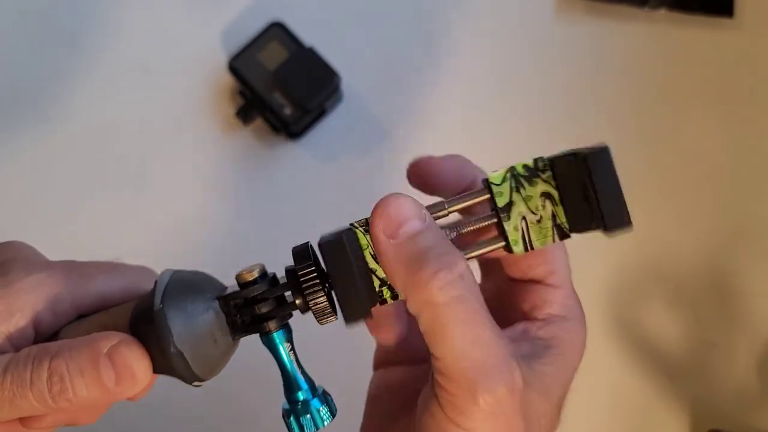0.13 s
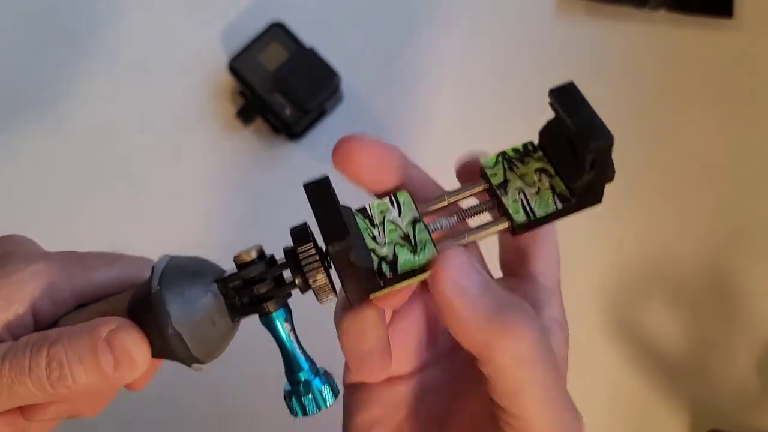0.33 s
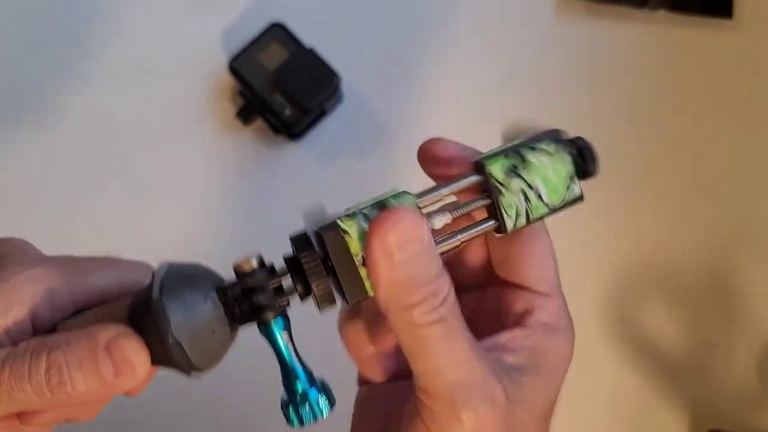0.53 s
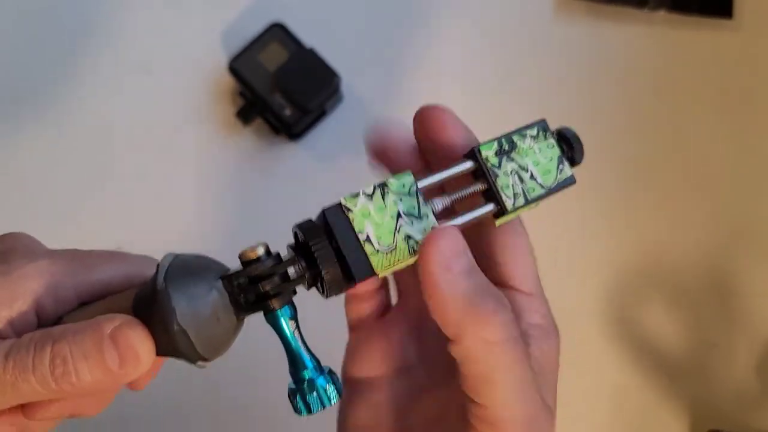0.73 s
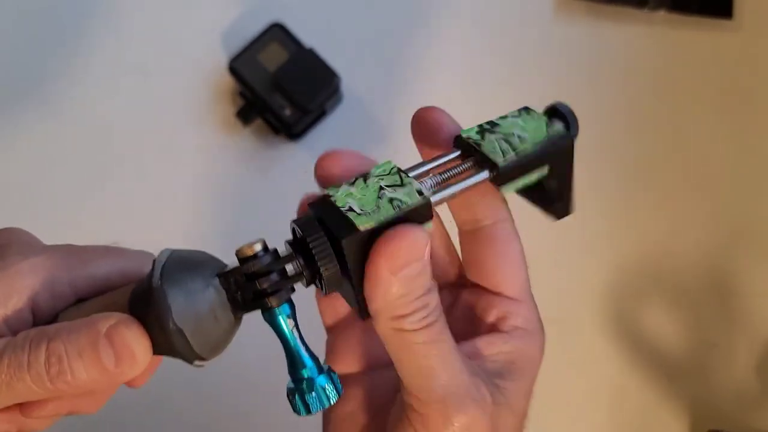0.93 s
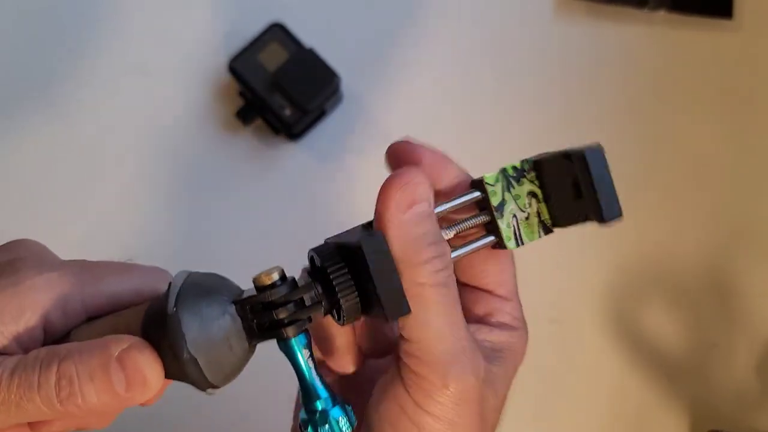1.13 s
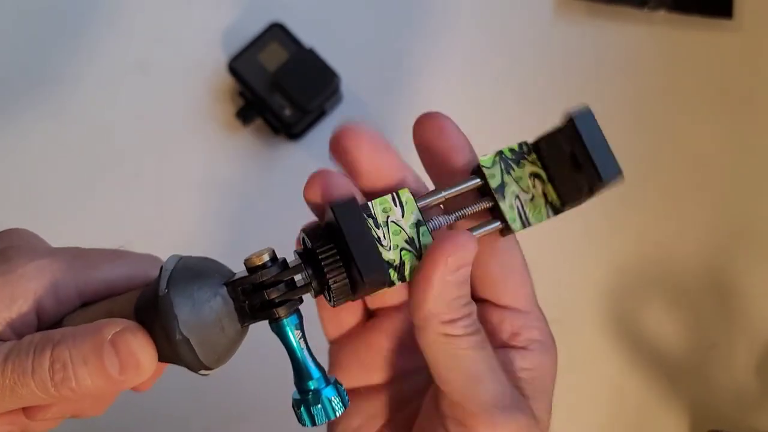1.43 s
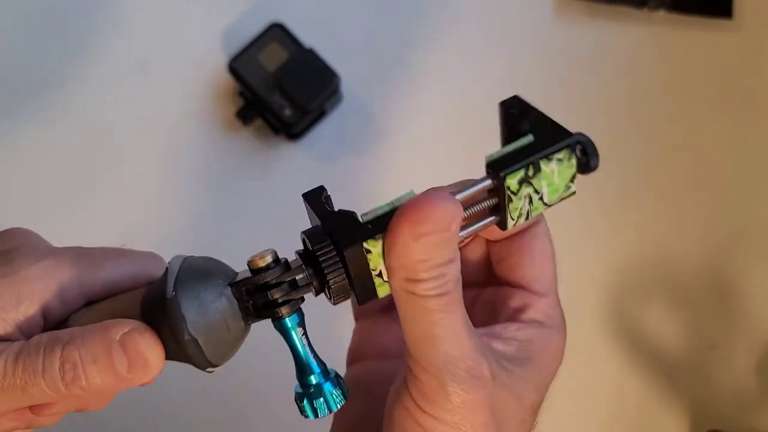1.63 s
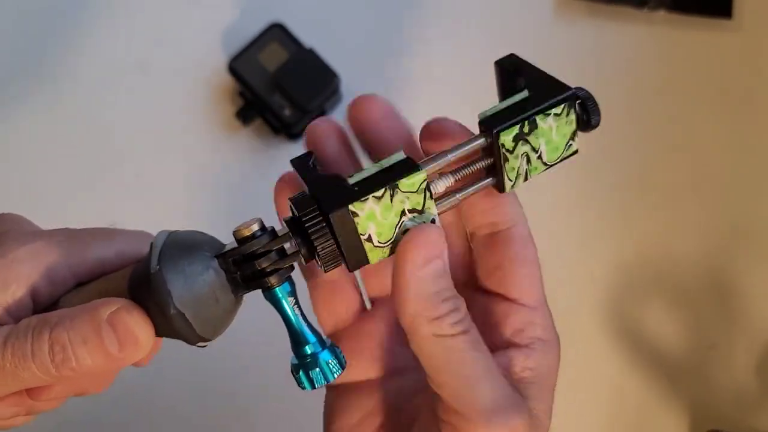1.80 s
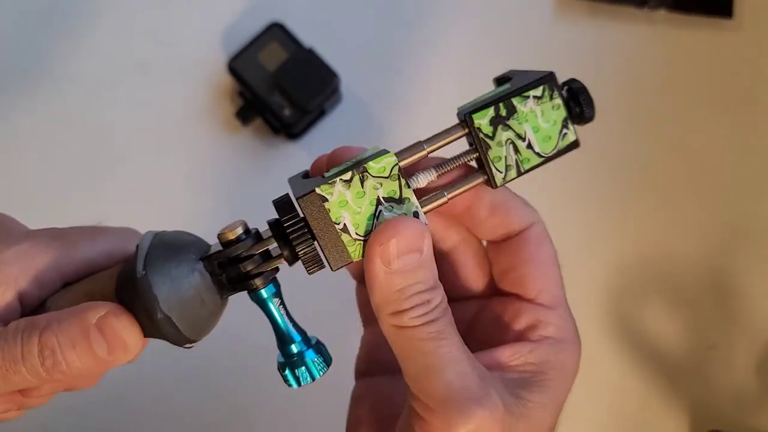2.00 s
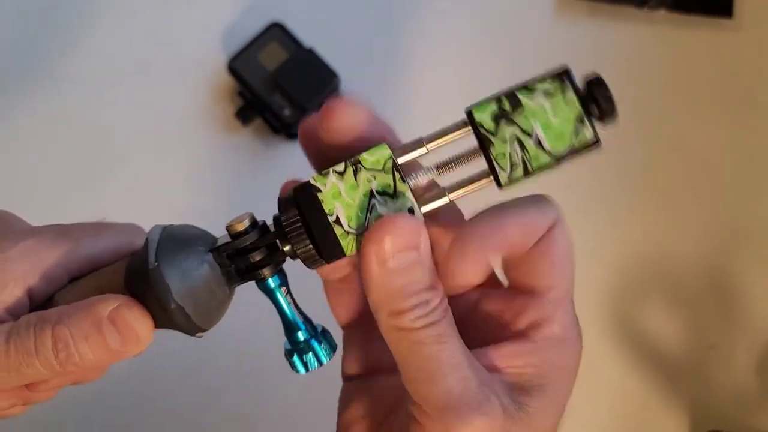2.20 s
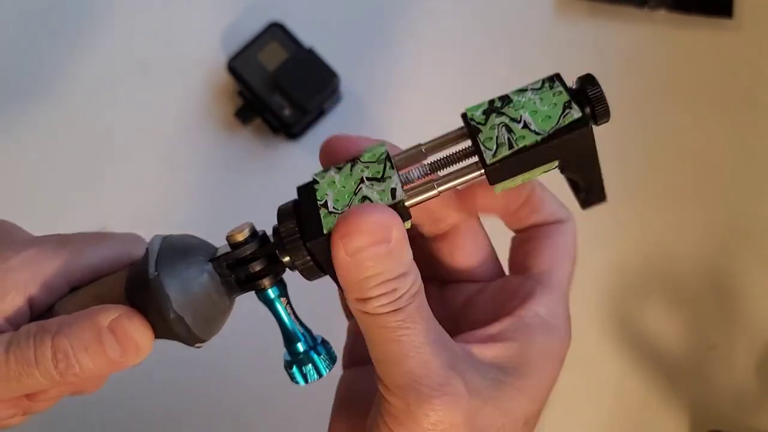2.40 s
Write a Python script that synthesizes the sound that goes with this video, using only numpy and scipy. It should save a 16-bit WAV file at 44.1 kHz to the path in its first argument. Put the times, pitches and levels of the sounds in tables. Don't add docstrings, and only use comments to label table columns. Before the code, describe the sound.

A small metal and plastic clamp is spun by hand, very close, in a quiet small room. Light clicks start at once; a dull low table thump booms at 0.2-0.3 s. A loud bright clack lands at 0.57 s, then sparse ticks, weaker snaps at 1.0 and 1.88 s, soft taps around 1.2 and 1.6 s, and a hard double clatter at 2.22 s. Faint skin and thread rubbing continues intermittently, ending with a light brush at 2.55 s.

```python
import sys
import numpy as np
from scipy import signal
from scipy.fft import rfft, irfft
from scipy.io import wavfile

SR = 44100
rng = np.random.default_rng(int(sys.argv[2]) if len(sys.argv) > 2 else 0)


def decibels_to_gain(level_db):
    exponent = np.asarray(level_db, float) / 20
    return 10 ** exponent


def store_wav(level_fs):
    pcm = np.round(np.clip(np.atleast_2d(level_fs), -1, 1) * 32767)
    wavfile.write(sys.argv[1], SR, pcm.T.astype(np.int16))


N = 112454


def rms_one(x):
    return x / np.sqrt(np.mean(x ** 2) + 1e-20)


def drift(rate_hz):
    step = 40
    pole = np.exp(-2 * np.pi * rate_hz * step / SR)
    noise = rng.standard_normal(N // step + 2002)
    slow = signal.lfilter([1], [1, -2 * pole, pole * pole], noise)[2000:]
    return np.interp(np.arange(N) / step, np.arange(len(slow)), rms_one(slow))


def colour(x, points):
    hz, db = np.transpose(points)
    f = np.arange(N // 2 + 1) * SR / N + 1
    gain = decibels_to_gain(np.interp(np.log(f), np.log(hz), db))
    return rms_one(irfft(rfft(x) * gain, N))


def band(x, low_hz, high_hz):
    edges = [low_hz, min(high_hz, .45 * SR)]
    return signal.sosfilt(signal.butter(2, edges, "band", fs=SR, output="sos"), x)


def low_pass(x, order, hz):
    return signal.sosfilt(signal.butter(order, hz, fs=SR, output="sos"), x)


def train(s, sizes):
    at = np.clip((s * SR).astype(int), 0, N - 1)
    return np.bincount(at.ravel(), np.ravel(sizes), N)


def ring(clicks, hz, t60):
    r, w = decibels_to_gain(-60 / (t60 * SR)), 2 * np.pi * hz / SR
    return signal.lfilter([0, np.sin(w)], [1, -2 * r * np.cos(w), r * r], clicks + 1e-18)


# (frequency [Hz], density [dB per Hz])
AIR_MID = [(18, -45.5), (30, -6), (66, -0.5), (187, -14), (307, -12), (945, -27.5), (1510, -25.5),
           (6890, -34), (15500, -46.5)]
AIR_SIDE = [(18, -40.5), (30, -9), (69, -1.5), (160, -13.5), (420, -6), (945, -19), (1400, -17),
            (7080, -31), (15500, -40.5)]


def air():
    mid = decibels_to_gain(-55.5 + 0.5 * drift(18)) * colour(rng.standard_normal(N), AIR_MID)
    side = decibels_to_gain(-57.5 + 1.1 * drift(4.6)) * colour(rng.standard_normal(N), AIR_SIDE)
    return np.array([mid + side, mid - side])


def room(x):
    room_t60_s, scatter_t60_s = 0.2, .08
    t = np.arange(SR // 2) / SR
    white = rng.standard_normal((2, len(t)))
    dull = low_pass(white, 1, 6400)
    tail = dull * decibels_to_gain(-60 * t / room_t60_s) + .25 * white * decibels_to_gain(-60 * t / scatter_t60_s)
    tail *= np.clip(.25 + t / .02, 0, 1)
    return signal.fftconvolve(x, tail / np.sqrt(np.sum(tail ** 2) / 2), axes=1)[:, :N]


def blurred(x):
    swing = low_pass(rng.standard_normal(N), 1, 600)
    return x * np.tanh(2 * rms_one(swing))


# (time [s], level [dB])
SWAY = [(0, -48.5), (.17, -70.5), (.6, -35), (.69, -42.5), (.86, -58), (1.15, -45), (1.28, -55),
        (1.38, -45), (1.5, -42), (1.6, -57.5), (1.77, -48), (1.9, -54.5), (2.1, -74), (2.21, -51),
        (2.55, -61)]


def sway():
    hum = band(rng.standard_normal(N + SR), 43.5, 67.2)[SR:]
    level_db = np.interp(np.arange(N) / SR, *np.transpose(SWAY))
    return decibels_to_gain(np.minimum(level_db, -43)) * rms_one(hum)


# (time [s], level [dB], direction [+1 or -1])
BUMPS = [
    (.202, -24, 1),
    (.217, -27, 1),
    (.2308, -21.8, -1),
    (.239, -16, 1),
    (.2486, -17.9, 1),
    (.2828, -15.5, -1),
]
# (frequency [Hz], level [dB], decay t60 [s])
TABLE_MODES = [(41.9, -16, 2.0), (55.6, -9.5, 2.0), (64.2, 5.8, .53), (82.3, -8.5, 2.0), (87.8, -6.7, 1.9),
               (100.9, -2.8, .78), (222, -16, .25)]


def table():
    hand_rests_s, hand_t60_s = .52, .4
    s, db, direction = np.transpose(BUMPS)
    push = low_pass(train(s, decibels_to_gain(db) * np.sign(direction)), 4, 155)
    boom = sum(decibels_to_gain(db - 5.5) * ring(push, hz, t60) for hz, db, t60 in TABLE_MODES)
    hand = decibels_to_gain(-60 * np.maximum(np.arange(N) / SR - hand_rests_s, 0) / hand_t60_s)
    return hand * boom


# (start [s], length [s], level
# [dB], centre frequency [Hz], width [octaves])
RUBS = [(.001, 0.13, -48.5, 5700, 2.6), (.01, 0.044, -48.5, 2280, 0.22), (0.188, 0.44, -50, 435, 1.15),
        (0.45, 0.063, -48.5, 3430, 2.7), (0.514, 0.045, -40, 9500, 4.3), (.49, 0.052, -53.5, 9100, 2.3),
        (0.517, 0.36, -48.5, 537, 0.86), (0.93, 0.18, -50.5, 503, 1.3), (0.941, 0.28, -54.5, 2970, 3.16),
        (0.978, 0.12, -51, 11100, 1.15), (1.059, 0.12, -55.5, 10900, 2.05), (1.28, 0.27, -46, 93, 0.61),
        (1.368, 0.38, -69.5, 4600, 2.04), (1.571, 0.088, -56, 10640, 5.5), (1.872, 0.025, -45.5, 6000, 3.4),
        (2.207, 0.05, -45.5, 700, 1.85), (0.21, 0.29, -47.5, 218.5, 0.32), (1.68, 0.099, -55.5, 583, 0.87),
        (2.532, 0.16, -41, 9300, 2.1)]


def rub():
    grains_per_s, grain_spread_db, smooth = 3700, 1.5, .35
    born = rng.random(N) < grains_per_s * decibels_to_gain(3.0 * drift(40)) / SR
    size = decibels_to_gain(grain_spread_db * np.minimum(rng.exponential(1, N), 4))
    grains = born * size * rng.choice([-1, 1], N)
    grit = rms_one(np.array([np.roll(grains, 30), grains]))
    grit = grit + smooth * rng.standard_normal((2, N))
    out, t = np.zeros((2, N)), np.arange(N) / SR
    for s, length, db, hz, octaves in RUBS:
        on = (t >= s) & (t < s + length)
        swell = np.sin(np.pi * ((t[on] - s) / length) ** .7) ** 1.8
        half = 2 ** (octaves / 2)
        out[:, on] += decibels_to_gain(db) * swell * rms_one(band(grit[:, on], hz / half, hz * half))
    return out


# (time [s], peak level [dB],
# frequency [Hz], decay t60 [s])
TAPS = [(1.11, -43.5, 408, 0.025), (1.182, -53.5, 1077, 0.1), (1.191, -46, 1910, 0.043),
        (1.192, -47, 672, 0.12), (1.213, -39.5, 404, 0.13), (1.215, -42.5, 803, 0.085),
        (1.237, -44.5, 1367, 0.042), (1.242, -44, 1490, 0.014), (1.626, -37.5, 766, 0.049),
        (1.626, -41, 414, 0.042), (2.22, -35.5, 1760, 0.03), (2.221, -38, 1080, 0.075),
        (2.223, -40, 593, 0.088)]


def taps():
    x = np.zeros(N)
    for s, db, hz, t60 in TAPS:
        mode = ring(train(np.array([s]), [decibels_to_gain(db)]), hz, t60)
        softened = signal.lfilter([.1], [1, -.9], mode)
        x += softened * np.hypot(1, hz / 740)
    return np.array([decibels_to_gain(6.5) * np.roll(x, 30), decibels_to_gain(-3.5) * x])


LEAD_S = .0025


def knock(modes, fav_hz, bright_db, favour_db, crack_db, count):
    chatter_s, lag_s = .0012, .0007
    bright_from_hz, favour_oct = 7000, .55
    lead_db, crack_t60_s, crack_oct = -17, .007, 2
    t = np.arange(SR // 30) / SR - LEAD_S
    hz, width_hz, db = np.transpose(modes)[..., None]
    nearness = np.exp(-(np.log2(hz / fav_hz) / favour_oct) ** 2)
    db = db + favour_db * (nearness - 1) + bright_db * (hz > bright_from_hz)
    turn = np.arctan(np.clip(np.tan(np.pi * hz * lag_s), -1.5, 1.5))
    port = np.array([1, 0])[:, None, None]
    out = np.zeros((2, len(t)))
    for k in range(count):
        since = t - chatter_s * k / count * rng.uniform(0.8, 1.3)
        heard = np.maximum(since - port * lag_s, 0)
        spread_db = 2.5 * rng.standard_normal(hz.shape)
        size = decibels_to_gain(db - 7.8 * k + spread_db) / np.cos(turn)
        phase = 2 * np.pi * (hz * since + rng.random(hz.shape))
        wave = np.sin(phase + (1 - 2 * port) * turn)
        envelope = np.minimum(heard / 0.00019, 1) * np.exp(-np.pi * width_hz * heard)
        out += np.sum(size * wave * envelope, axis=1)
    graze = decibels_to_gain(lead_db) * (1 + t / LEAD_S)
    strike = np.minimum(decibels_to_gain(lead_db) + t / 0.00024, 1) * decibels_to_gain(-60 * t / crack_t60_s)
    burst = np.where(t < 0, graze, strike) * rng.standard_normal(len(t))
    edges = fav_hz * 2 ** (np.array([-.5, .5]) * crack_oct)
    crack = band(band(burst, *edges), *edges)
    crack = crack + decibels_to_gain(bright_db - 9.5) * band(burst, bright_from_hz, 26000)
    crack = np.array([np.roll(crack, int(lag_s * SR)), crack])
    out = band(out + decibels_to_gain(crack_db) * crack, 700, SR)
    return out / np.abs(out.mean(axis=0)).max()


def clamp(rows, modes, favour_db, crack_db, count):
    out = np.zeros((2, N + SR))
    for s, db, hz, bright_db in rows:
        one = knock(modes, hz, bright_db, favour_db, crack_db, count)
        i = int((s - LEAD_S) * SR)
        out[:, i:i + one.shape[1]] += decibels_to_gain(db) * one
    pan_db = -2.5
    return out[:, :N] * decibels_to_gain(np.array([[.5], [-.5]]) * pan_db)


# (time [s], peak level [dB], favoured frequency [Hz], brightness [dB])
KNOCKS = [(0.0235, -30.5, 6100, 0), (0.0628, -29, 2120, -12.5), (0.0798, -37, 3900, -18.5),
          (0.4652, -34, 4690, 0.5), (0.4757, -34.5, 2920, 3.5), (0.4833, -34.5, 5360, -8),
          (.522, -37, 13630, -4), (0.5388, -29, 4300, -9), (0.5885, -38, 4140, -4.5),
          (0.9535, -34.5, 2100, -9), (.975, -40.5, 7000, -5), (0.9658, -30.5, 5500, 2.5),
          (1.0424, -39.5, 2130, -7), (2.1997, -29.5, 4370, 1.5), (2.2075, -30, 6200, 0),
          (2.2148, -29.5, 4000, 2.5), (2.5375, -60, 6960, -4), (2.545, -36, 12800, -6)]
TICKS = [(0.6876, -38, 1570, -21), (0.6974, -39.5, 1740, 5), (0.7684, -36, 4470, 6),
         (0.848, -37.5, 6480, -5.5), (1.1027, -46.5, 2180, -10), (1.4716, -42.5, 4800, -20),
         (1.7205, -58, 2500, -8), (1.733, -41, 5470, 3.5), (2.0713, -51, 3670, -4),
         (2.1256, -45.5, 2600, -10), (2.126, -41.5, 5600, -6), (2.176, -45, 4380, -12),
         (2.317, -41, 1700, 7)]
# (frequency [Hz], level [dB])
CLAMP_MODES = [(1130, -3.5), (1750, -18), (2120, 4), (2600, -9), (3220, 2), (3950, 0.5), (4900, -3.5),
               (5830, -5), (6650, -2.5), (8500, -4), (10600, -5), (11270, 10.5), (12800, -3), (13500, -6.5)]


def loose_rattle():
    t60_s = .007
    width_hz = np.log(1000) / np.pi / t60_s
    modes = [(hz, width_hz, db) for hz, db in CLAMP_MODES]
    return clamp(KNOCKS, modes, 15, -0.5, count=2) + clamp(TICKS, modes, 15, -0.5, count=1)


# (time [s], peak level [dB], favoured frequency [Hz], brightness [dB])
SLAM_A = [(.5603, -31, 4000, -4), (.5618, -20, 6700, 0), (.563, -19, 6700, 0), (.5642, -16, 6700, 2),
          (.5663, -13, 11300, 0), (.5673, -10, 4870, 0), (.5688, -14, 11300, 0), (.5703, -16, 4870, 0),
          (.5745, -27, 6700, 0), (.5768, -25, 6000, 2), (.579, -27, 8700, 0)]
SLAM_B = [
    (1.0076, -20.5, 4800, -6),
]
SLAM_C = [
    (1.8815, -23, 4000, -2),
    (1.8822, -21, 6000, 0),
    (1.884, -29, 4000, -6),
    (1.888, -36, 12000, 0),
]
SLAM_D = [
    (2.2175, -28, 6670, -4),
    (2.2192, -12, 4800, 2),
    (2.2203, -14, 2300, 2),
    (2.2218, -13, 6670, -2),
    (2.223, -13, 2850, 2),
    (2.2255, -22, 14000, -2),
    (2.228, -24, 3000, 0),
]
SLAM_E = [
    (2.2347, -18, 5500, -5),
    (2.2382, -20, 6200, -6),
    (2.2398, -26, 7000, -2),
]
# (frequency [Hz], bandwidth [Hz], level [dB])
POSE_A = [(3167, 62, -22.5), (3976, 140, -10), (4867, 93, -9), (5793, 260, -5), (6870, 150, -2.5),
          (9400, 80, -8.5), (10320, 280, -17), (10580, 310, -24.5), (10750, 86, -9), (11240, 190, 5),
          (12360, 48, -12), (12800, 80, -29), (13520, 61, -10.5), (15320, 100, -19.5)]
POSE_B = [(1060, 180, -30), (3360, 150, 6), (4998, 430, 0), (7200, 290, -18), (9150, 220, -34),
          (9700, 170, -18), (11500, 340, -25)]
POSE_C = [(1200, 200, -13), (2000, 250, -7), (3130, 220, -5), (4170, 400, 2), (5120, 250, -2),
          (6010, 350, 3), (7630, 300, -3), (8260, 250, -7), (9050, 240, -6), (10300, 350, -3),
          (11900, 500, 4), (12800, 300, 1), (14100, 290, -16)]
POSE_D = [(2128, 160, -10.5), (2990, 480, 4.5), (5830, 110, -6), (6644, 217, 1), (7720, 130, -11.5),
          (8400, 170, -11.5), (10300, 120, -3.5), (10700, 120, -2), (10900, 77, -7), (11430, 99, -9.5),
          (11150, 190, -23.5), (13650, 140, -8), (14870, 230, -12), (15200, 59, -16)]
POSE_E = [(1210, 200, -10), (3210, 250, -5), (4490, 250, -7), (5490, 250, -3), (6180, 250, 0),
          (7100, 250, -5), (8720, 250, -8), (10800, 260, -3), (13000, 250, -9), (14600, 250, -11)]


def jaw_slams():
    damping = 1.7
    slams = [(SLAM_A, POSE_A), (SLAM_B, POSE_B), (SLAM_C, POSE_C), (SLAM_D, POSE_D), (SLAM_E, POSE_E)]
    out = np.zeros((2, N))
    for blows, pose in slams:
        out += clamp(blows, np.array(pose) * [1, damping, 1], 7, -3.5, count=1)
    return out


def scene():
    hard, soft = loose_rattle() + jaw_slams(), taps()
    low = table() + sway()
    low = np.array([decibels_to_gain(-.5) * low, decibels_to_gain(.5) * np.roll(low, 12)])
    reflected = decibels_to_gain(-8.5) * room(blurred(hard) + 0.45 * soft)
    return air() + low + rub() + soft + hard + reflected


def top_cut(x):
    return signal.sosfilt(signal.butter(12, 16470, fs=SR, output="sos"), x)


def record(dry):
    mix = signal.sosfilt(signal.cheby2(10, 50, 16500, fs=SR, output="sos"), dry)
    return top_cut(mix)


dry = scene()
out = record(dry)
store_wav(out)
```